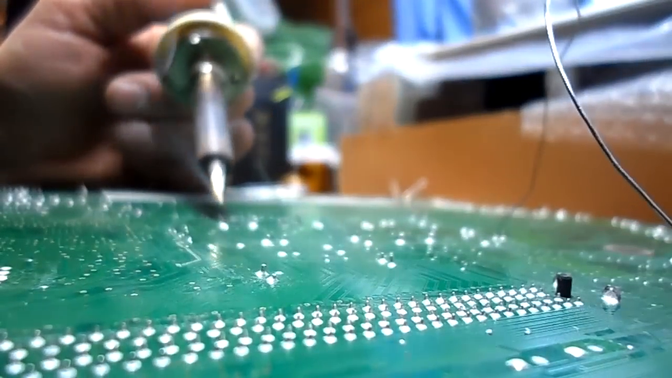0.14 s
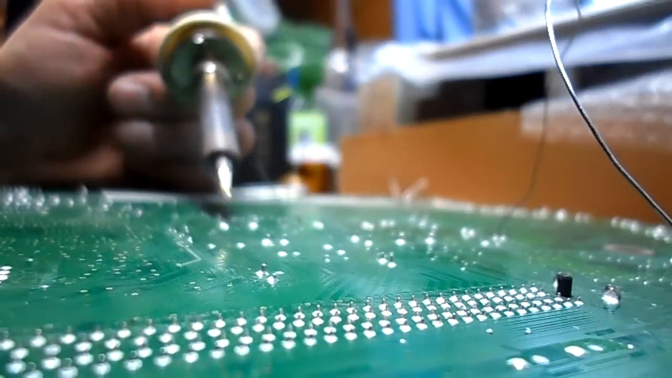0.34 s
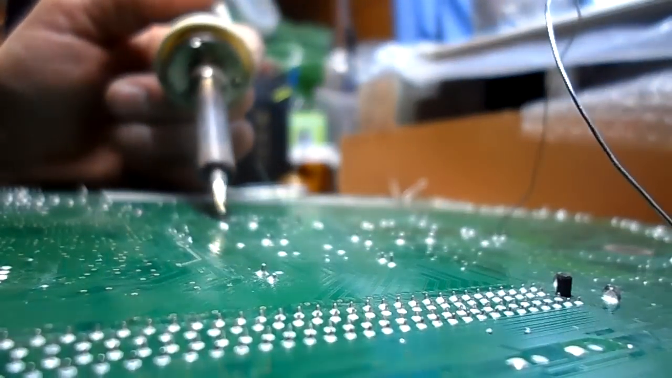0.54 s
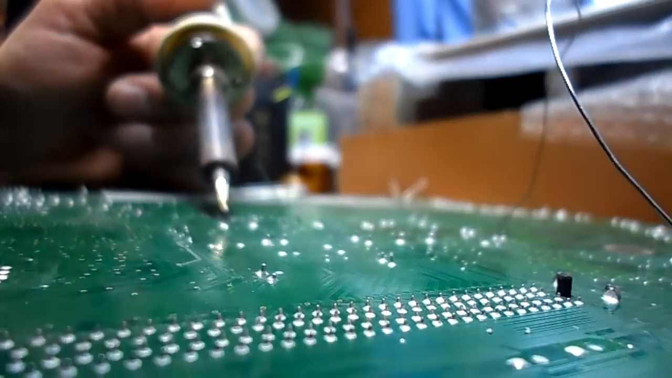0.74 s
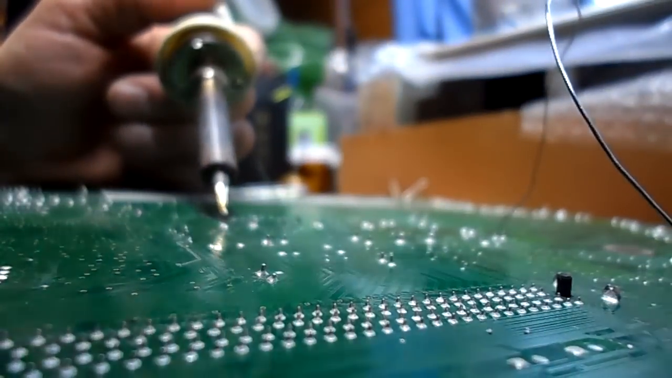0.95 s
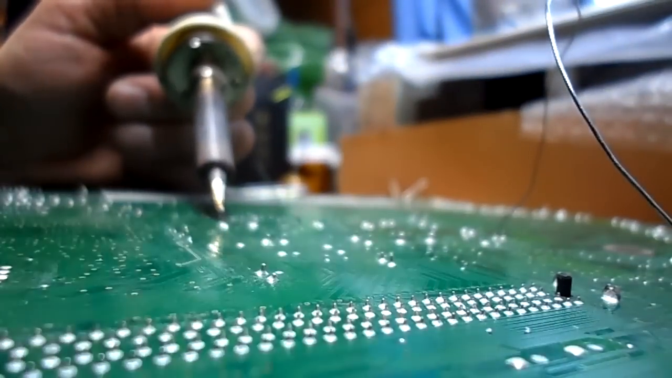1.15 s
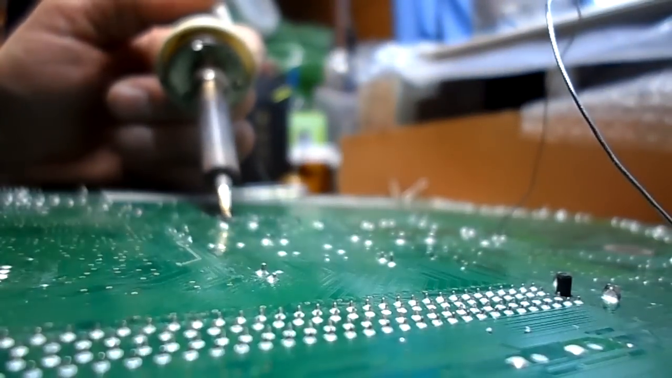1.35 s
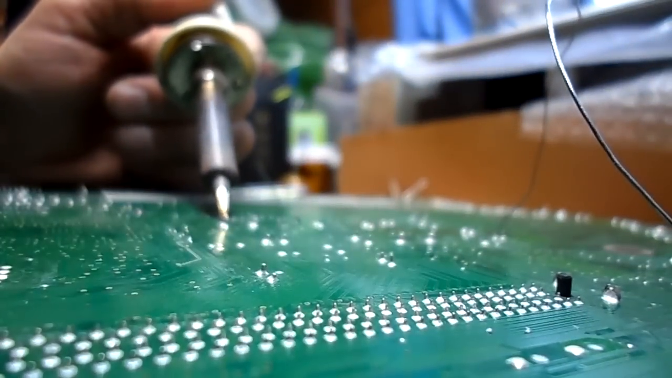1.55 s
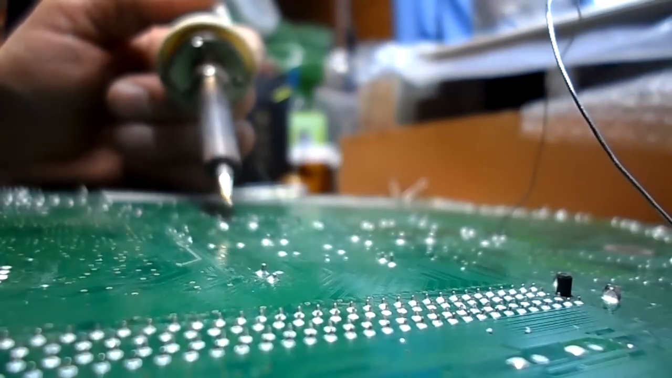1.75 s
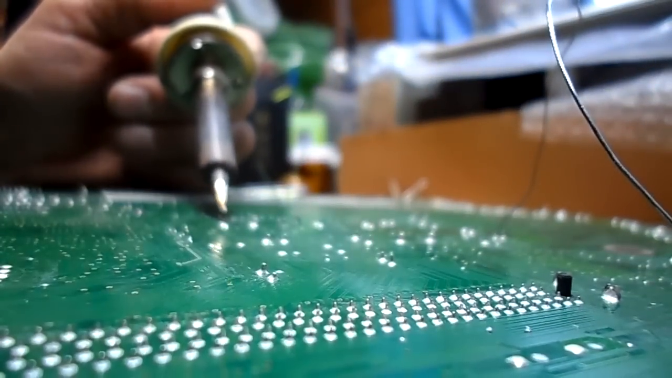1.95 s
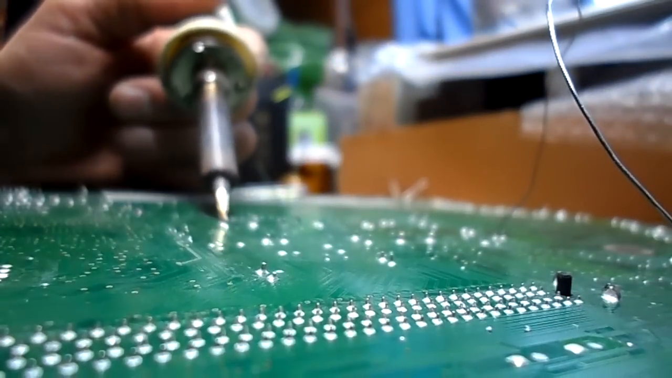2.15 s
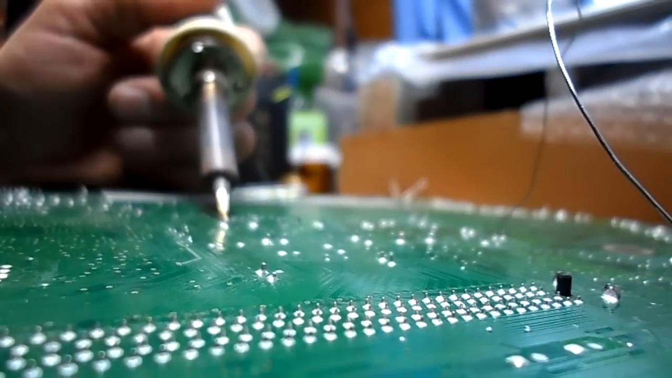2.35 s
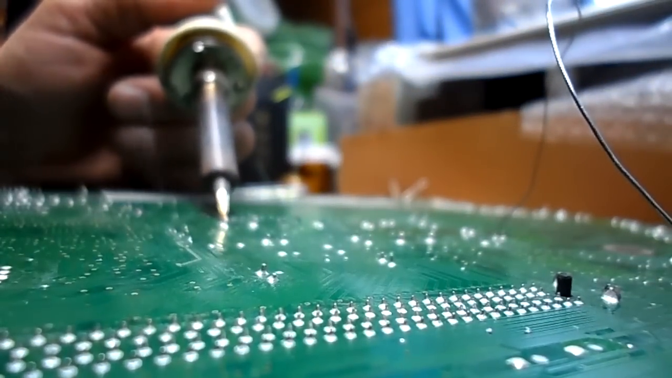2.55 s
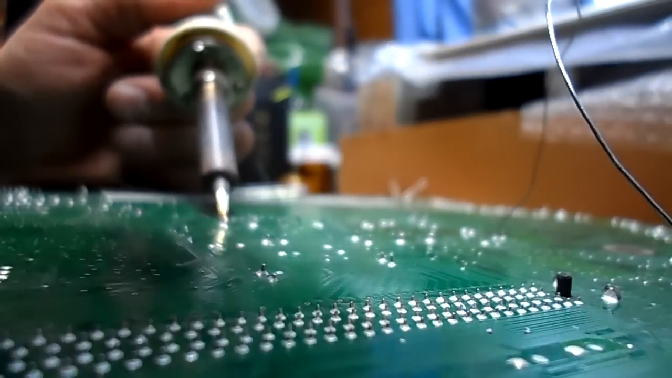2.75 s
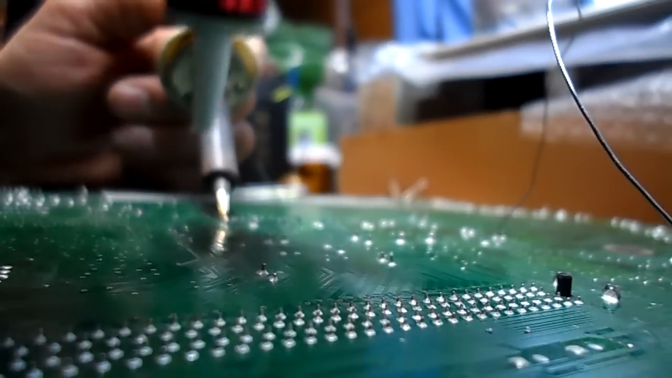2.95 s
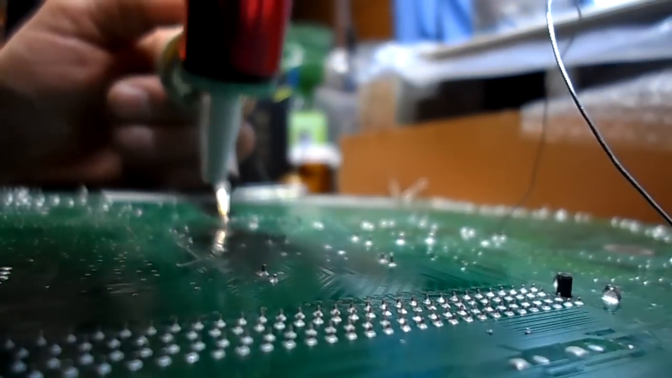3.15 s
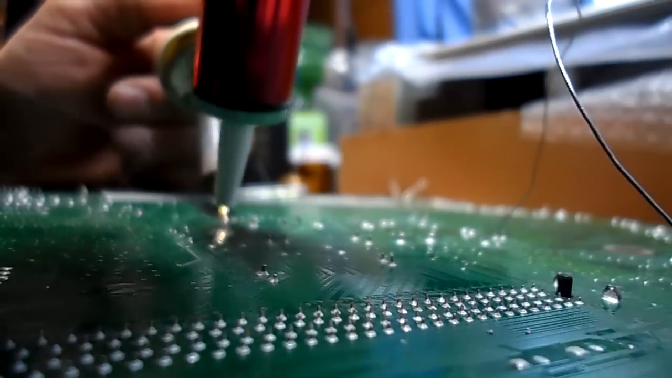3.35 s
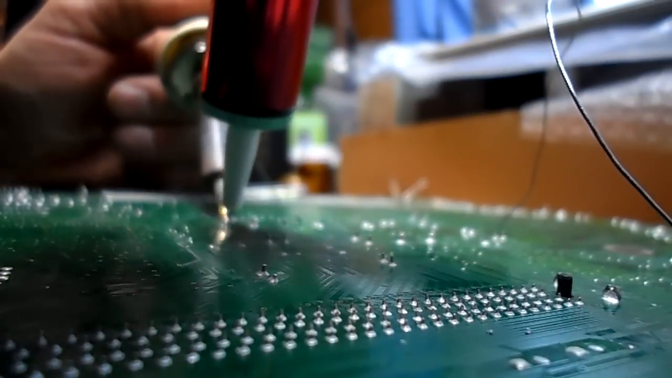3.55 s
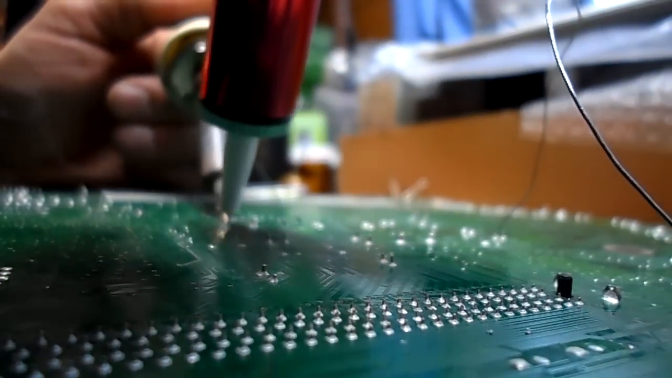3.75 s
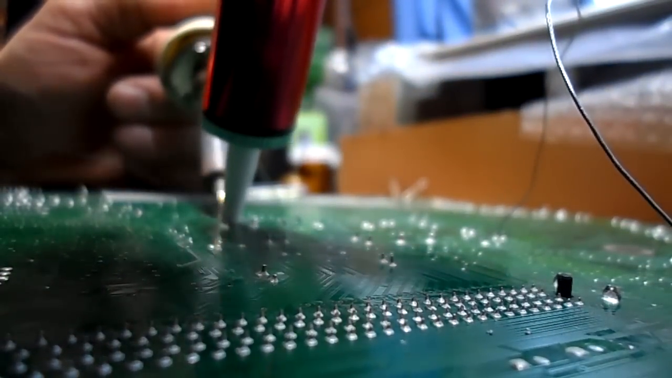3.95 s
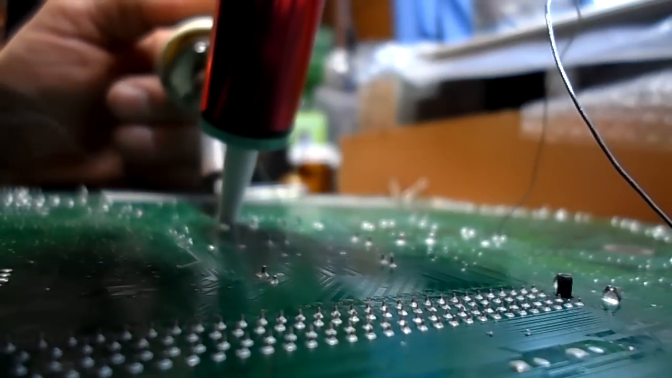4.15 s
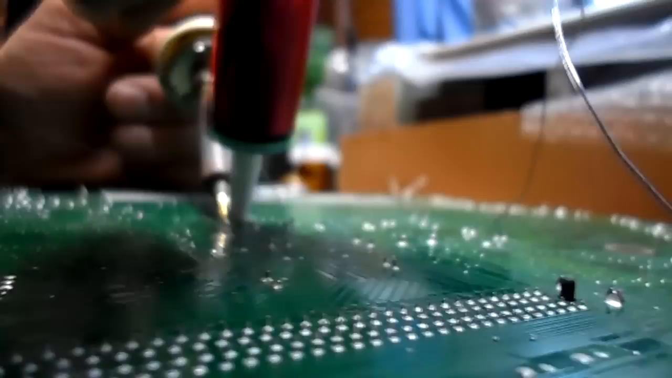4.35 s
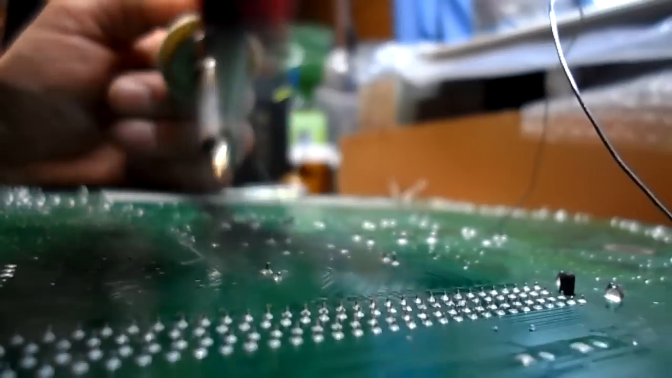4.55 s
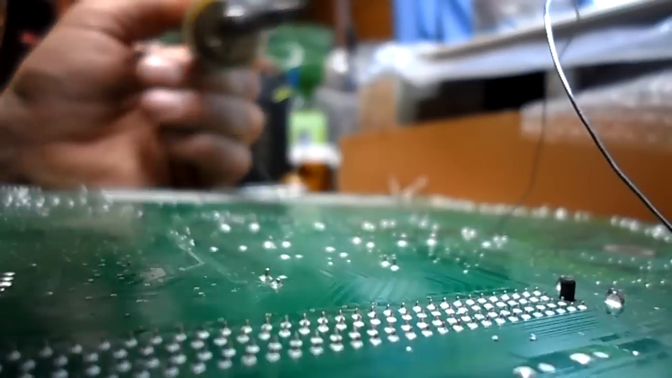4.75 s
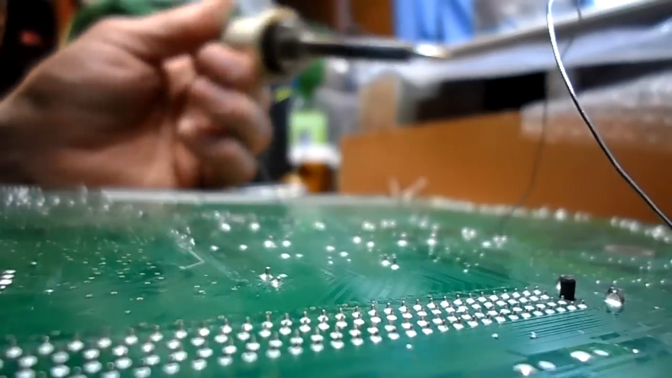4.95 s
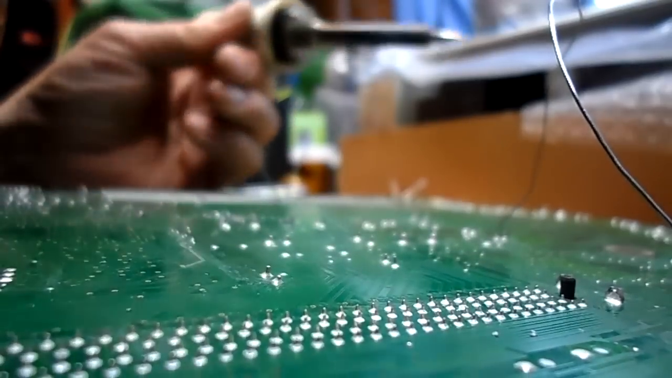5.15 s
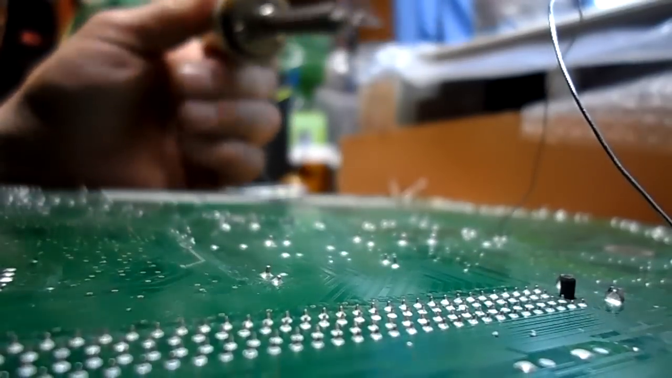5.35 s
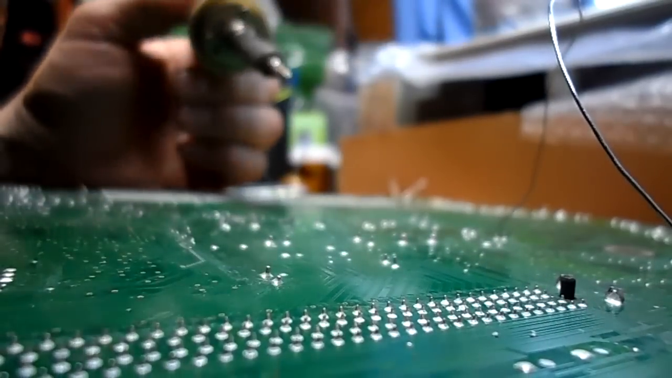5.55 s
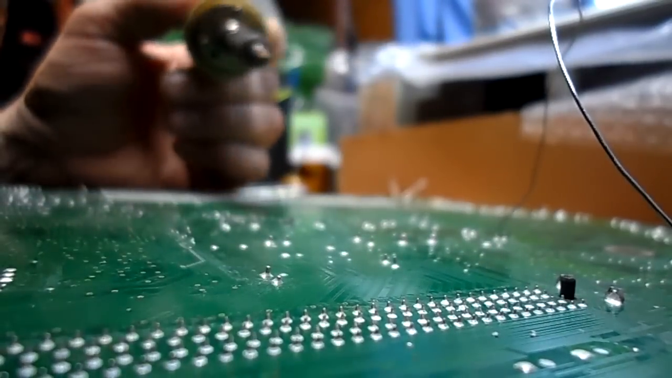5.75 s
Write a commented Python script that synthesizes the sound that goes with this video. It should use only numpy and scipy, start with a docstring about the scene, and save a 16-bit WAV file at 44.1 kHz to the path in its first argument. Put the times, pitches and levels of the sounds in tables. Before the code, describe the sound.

Light plastic clicks and finger rubbing above a humming workshop fan, a violent spring snap, then quieter handling and a bright latch click.

```python
"""Firing a solder sucker

A spring-loaded solder sucker is handled, cocked and fired over a circuit board close to a small microphone.
Blows, clicks, slips and rubbing fingers are noise bursts through resonances; thuds and the latch sum modes.
A workshop fan hums behind them as wavering tones over shaped noise, and a short room tail follows each part.
Gain control ducks after the loudest peaks, and a soft knee holds them.
"""
import sys
import numpy as np
from scipy import signal
from scipy.fft import rfft, irfft
from scipy.io import wavfile
from scipy.ndimage import uniform_filter1d, minimum_filter1d

SR = 44100
rng = np.random.default_rng(int(sys.argv[2]) if len(sys.argv) > 2 else 0)


def to_wav(s):
    """Save 16-bit WAV."""
    ch = np.atleast_2d(s).T  # columns
    pcm = np.round(np.clip(ch, -1, 1) * 32767)  # PCM
    wavfile.write(sys.argv[1], SR, pcm.astype(np.int16))


def gain_from_decibels(decibels):
    """Convert decibel values to linear amplitude factors."""
    exponent = np.asarray(decibels, float) / 20
    return 10 ** exponent


N = 255358  # samples in the scene


def evened(x):
    """Normalisation to unit rms."""
    return x / np.sqrt(np.mean(x ** 2) + 1e-20)


def peaked(x, db):
    """Normalisation to a peak level in dB."""
    return gain_from_decibels(db) * x / (abs(x).max() + 1e-12)


def read(points, hz):
    """Interpolation of a curve along logarithmic frequency."""
    f, value = np.transpose(points)
    return np.interp(np.log(hz + 1), np.log(f + 1), value)


def colour(x, points):
    """Linear filtering: the spectrum is multiplied by a gain curve in dB."""
    gain = gain_from_decibels(read(points, np.fft.rfftfreq(N, 1 / SR)))
    return irfft(rfft(x) * gain, N)


def add(mix, s, sound):
    """Superposition of a sound on the mix from time s."""
    part = mix[round(s * SR):][:len(sound)]
    part += sound[:len(part)]


def resonate(x, hz, width_hz):
    """Heterodyned resonance of unit gain: shift hz down to zero, smooth, shift back."""
    turn = np.exp(2j * np.pi * np.cumsum(hz * np.ones(len(x))) / SR)
    r = np.exp(-np.pi * width_hz / SR)
    smooth = signal.lfilter([1 - r], [1, -r], x / turn)
    return 2 * (turn * smooth).real


def steep(x, hz, width_hz):
    """Two equal resonances in cascade, which double the slope of the skirts."""
    return resonate(resonate(x, hz, width_hz), hz, width_hz)


def wander(length, size):
    """Low-passed noise of rms 1: two moving averages of size samples."""
    once = uniform_filter1d(rng.standard_normal(length), size)
    return evened(uniform_filter1d(once, size))


def drift(top_hz):
    """Slow random modulation of rms 1: 24 sines of random phase whose power falls as 1/f."""
    t = np.arange(0, N + 256, 256) / SR
    slow = sum(np.sin(2 * np.pi * (f * t + rng.random())) / np.sqrt(f)
               for f in np.geomspace(.2, top_hz, num=24))
    return np.interp(np.arange(N) / SR, t, evened(slow))


def blow(s, db):
    """Impact excitation: a crack and spring rattle colour the barrel; a low knock enters the board."""
    # barrel resonances: (centre [Hz], width [Hz], level [dB])
    barrel_modes = [(487, 400, -2), (1000, 550, -18.5), (2400, 450, -3), (3300, 1100, -8.5),
                    (5200, 1200, -9), (7000, 4300, -1.5), (10200, 1600, -0.5)]
    t = np.arange(3000) / SR
    crack = np.exp(-t / .0006)
    rattle = gain_from_decibels(-17.5 + 8.5 * wander(3000, size=25)) * np.exp(-t / 0.012)
    shake = rng.standard_normal(3000) * (crack + rattle)
    barrel = sum(gain_from_decibels(d) * evened(resonate(shake, hz, w)) for hz, w, d in barrel_modes)
    knock = steep(rng.standard_normal(3000) * crack, hz=700, width_hz=2200)
    return s, peaked(peaked(barrel, db=4.5) + peaked(knock, db=-6), db)


def latch(s, db, bright_db):
    """Modal synthesis: a sharp knock rings latch and barrel; a harder contact is brighter."""
    # modes of latch and barrel: (frequency [Hz], width [Hz], relative level [dB])
    latch_modes = [(2944, 230, -1.5), (3980, 640, -10), (5100, 350, -12), (6850, 480, -3.5),
                   (8300, 330, -12.5), (8840, 270, -9), (9570, 380, -14.5), (10800, 400, -11.5),
                   (15000, 1500, -0.5)]
    t = np.arange(1500) / SR
    sound = np.zeros(1500)
    for k, (hz, w, d) in enumerate(latch_modes):
        octaves = np.log2(hz / latch_modes[0][0])
        decay = gain_from_decibels(db + d + bright_db * octaves) * np.exp(-np.pi * w * t)
        tuning = rng.uniform(.99, 1.01)
        sound += (-1) ** k * decay * np.sin(2 * np.pi * hz * tuning * t)
    return s, sound


def ring(burst, db, low_hz, high_hz, high_db, width):
    """Source and filter: a burst excites a low and a high ring of plastic, with a little crack on top."""
    edge = np.diff(burst, prepend=0)  # small parts radiate little below their lowest ring
    low = steep(edge, low_hz, width * low_hz)
    high = steep(burst, high_hz, width * high_hz)
    crack = np.diff(edge, prepend=0)
    rings = peaked(low, db=-1.5) + peaked(high, high_db)
    return peaked(rings + peaked(crack, high_db - 7.0), db)


def click(s, db, low_hz, high_hz, high_db):
    """Exponential decay scaled by period: larger parts ring lower and rattle longer."""
    cycles, width = 3.96, 0.58  # decay time in cycles of the low ring; ring width over pitch
    t = np.arange(1500) / SR
    burst = rng.standard_normal(1500) * np.exp(-t * low_hz / cycles)
    return s, ring(burst, db, low_hz, high_hz, high_db, width)


def scrape(s, length, db, low_hz, high_hz, high_db):
    """Stick-slip friction: dense slips of uneven size while the part drags, then a quick fade."""
    t = np.arange(5000) / SR
    drag = np.minimum(t / 0.00033, 1) * np.exp(-np.maximum(t - length, 0) / 0.0015)
    unevenness = evened(uniform_filter1d(rng.standard_normal(5000), size=40))
    slips = rng.standard_normal(5000) * gain_from_decibels(3 * unevenness)
    width = 0.21 + 0.3 * np.exp(-length / 0.014)  # over pitch: a long drag rings narrower
    return s, ring(slips * drag, db, low_hz, high_hz, high_db, width)


def skid(s, length, tap_db, skid_db):
    """Friction-driven modes: a tap, then clumped slips, through the narrow modes of a metal part."""
    # modes of the part: (centre [Hz], width [Hz], relative level [dB])
    part_modes = [(1036, 58, -2.5), (1610, 120, 1.5), (2020, 95, 0), (2470, 70, -6.5), (3110, 110, -7),
                  (3400, 80, -7), (3820, 60, -14), (4800, 150, -3.5), (5400, 100, -11), (6070, 140, -7),
                  (8500, 300, -6)]
    t = np.arange(round((length + .03) * SR)) / SR
    slips = gain_from_decibels(skid_db + 5.4 * wander(len(t), size=120)) * np.exp(-np.maximum(t - length, 0) / .003)
    tap = gain_from_decibels(tap_db) * np.exp(-t / 0.0038)
    shake = rng.standard_normal(len(t)) * (slips + tap)
    # the root makes up for the lesser noise power that a narrow mode passes
    return s, 4 * sum(gain_from_decibels(d) * resonate(shake, hz, w) * (100 / w) ** .5 for hz, w, d in part_modes)


def ping(s, db, hz, t60):
    """Modal density: a cluster of close high modes dies away as a blurred ring."""
    t = np.arange(round(t60 * SR)) / SR
    cluster = evened(steep(rng.standard_normal(len(t)), hz, 0.21 * hz))
    return s, gain_from_decibels(db - 60 * t / t60) * cluster * np.minimum(t / .001, 1)


def thud(s, db, centre_hz):
    """Modal excitation: a soft push rings the bench modes near its centre, each with a looser neighbour."""
    # bench modes: (frequency [Hz], decay time t60 [s])
    bench_modes = [(30, 0.25), (60, 0.14), (92, .11), (160, 0.098), (250, 0.054), (330, 0.054),
                   (520, 0.022), (915, 0.027)]
    reach_db = -17  # per octave squared away from the centre
    t = np.arange(SR // 4) / SR
    sound = np.zeros(len(t))
    for hz, t60 in bench_modes:
        decay = gain_from_decibels(db + reach_db * np.log2(hz / centre_hz) ** 2 - 60 * t / t60)
        onset = np.minimum(t * hz * 2, 1)  # half a cycle
        pair = np.sin(2 * np.pi * hz * t) + 0.39 * np.sin(2 * np.pi * 1.3 * hz * t)
        sound += decay * onset * pair
    return s, sound


def rub(s, rise, fall, db, low_db):
    """Skin friction: grainy noise in two bands that move with pressure, a body rumble and a thin top."""
    # centres of the low, high, body and top bands [Hz]
    band_hz = (3900, 8500, 895, 13500)
    # widths of the same bands [Hz]
    band_widths = (3300, 5470, 1823, 4500)
    # share by which each centre moves at firmest pressure [ratio]
    band_lifts = (-0.11, .08, 0.047, 0.024)
    band_levels = (low_db, 0, low_db - 7.5, -7.5)  # dB against the high band
    edge_db, roundness = -22.5, 1.035  # level at slack 1; 1 = pointed stroke, 2 = round top
    t = np.arange(-1.5 * rise, 1.5 * fall, 1 / SR)
    slack = np.where(t < 0, -t / rise, t / fall)  # 0 at firmest pressure
    sound = np.zeros(len(t))
    for band_db, hz, width_hz, share in zip(band_levels, band_hz, band_widths, band_lifts):
        lift = 1 + share * (1 - slack)
        # the skin catches and lets go
        grit = rng.standard_normal(len(t)) * gain_from_decibels(2.5 * wander(len(t), size=90))
        # the grip shifts a narrower ring about
        core_hz = hz * lift * (1 + .1 * wander(len(t), size=900))
        core = steep(grit, core_hz, .25 * width_hz)
        band = evened(steep(grit, hz * lift, width_hz)) + 0.4 * evened(core)
        sound += gain_from_decibels(band_db) * evened(band)
    sound *= gain_from_decibels(db + edge_db * slack ** roundness)
    return max(s + t[0], 0), sound[t >= -s]


def squeak(length):
    """Friction through sharp filters: a faint rubbing makes three rings sing and fade."""
    # rings: (centre [Hz], width [Hz], rms level before the swell [dB])
    squeak_rings = [(2810, 400, -68.5), (5600, 700, -69), (7500, 700, -70)]
    grit = rng.standard_normal(round(length * SR))
    rings = sum(gain_from_decibels(db) * evened(steep(grit, hz, w)) for hz, w, db in squeak_rings)
    return rings * signal.windows.hann(len(grit))


def fan():
    """Tonal and broadband machine noise: wavering blade and motor tones over shaped air noise."""
    # level shared by tones and air: (time [s], level [dB])
    fan_levels = [(0, 0.5), (1.4, 1.5), (2.1, 1.5), (3.0, -0.5), (3.8, -0.5), (4.5, -2), (5.79, -5)]
    # steady tones: (frequency [Hz], rms level before the shared level [dB], waver [dB])
    hum_tones = [(116.3, -71, 2.5), (180.2, -69.5, 4), (249.5, -47.5, 1.17), (738, -81, 2.5)]
    # swelling and fading motor whine: (time [s], rms level before the shared level [dB])
    whine_levels = [(0, -68.5), (.4, -69), (.95, -66.5), (1.55, -78), (2.05, -65), (2.64, -72),
                    (3.1, -66.5), (3.85, -69.5), (4.4, -65), (5.0, -69), (5.5, -62.5)]
    # shape of the air spectrum: (frequency [Hz], relative density [dB per Hz])
    air_shape = [(15, -5), (30, -1.5), (50, -6.5), (90, -17), (180, -12.5), (300, -19), (600, -25),
                 (1050, -23.5), (1800, -29.5), (3000, -34.5), (6000, -35.5), (10500, -35.5), (13000, -32),
                 (15500, -26.5)]
    air_db = -57.5  # rms before the shared level
    t = np.arange(N) / SR
    tones = hum_tones + [(1499, np.interp(t, *np.transpose(whine_levels)), 1.2)]
    hum = np.zeros(N)
    for hz, db, waver in tones:
        strength = np.sqrt(2) * gain_from_decibels(db + waver * drift(top_hz=12))
        phase = 2 * np.pi * (hz * t + rng.random()) + 0.34 * drift(top_hz=7.7)
        hum += strength * np.sin(phase)
    air = colour(rng.standard_normal(N), air_shape)
    return gain_from_decibels(np.interp(t, *np.transpose(fan_levels))) * (hum + gain_from_decibels(air_db) * evened(air))


def room(x):
    """Reverberation: sparse taps of random sign, each band dying at its own speed."""
    # reverberation time: (frequency [Hz], t60 [s])
    decay_times = [(300, 0.22), (1500, 0.16), (4000, 0.043), (9000, .12), (14000, 0.084)]
    taps = np.zeros(SR // 2)
    at = np.arange(80, len(taps) - 20, 20)
    taps[at + rng.integers(0, 20, len(at))] = rng.choice([-1., 1.], len(at))
    hz, t, z = signal.stft(taps, SR, nperseg=128)
    decay = gain_from_decibels(-60 * t / read(decay_times, hz)[:, None])
    tail = signal.istft(z * decay, SR, nperseg=128)[1]
    return signal.fftconvolve(x, tail / np.linalg.norm(tail))[:N]


def scene():
    """Superposition of near sounds, their reverberation and the fan."""
    # the piston slams home and bounces: (time [s], peak level [dB])
    blows = [(4.5049, -4), (4.5055, -5.5), (4.5078, -0.5), (4.5097, -18), (4.5162, -1), (4.5224, -5),
             (4.528, -17), (4.5351, -9.5), (4.543, -17), (4.5486, -28), (4.558, -18), (4.562, -17.5)]
    # the latch catches in two quick knocks: (time [s], knock level [dB], brightness [dB per octave])
    latch_knocks = [(5.672, -7.5, -8), (5.6733, -8, 2.5)]
    # clicks of plunger, latch and iron: (time [s], peak level [dB], low ring [Hz], high ring [Hz],
    # high ring peak where the low ring has -1.5 [dB])
    clicks = [(0.2992, -28, 3500, 9300, 5.5), (.536, -43, 4800, 8800, 3), (0.775, -36, 5600, 8500, 15),
              (0.79, -29.5, 4500, 9800, 9), (0.7968, -22, 3900, 10200, 7.5),
              (0.8808, -36.5, 2460, 5100, -6), (0.591, -45, 4700, 7500, -6), (0.9105, -41, 3570, 9000, -4),
              (0.956, -48, 4500, 8000, 5), (1.7104, -41.5, 1950, 10400, -17), (1.9039, -17, 4500, 9000, 12),
              (1.907, -17.5, 2900, 8160, 1), (2.2787, -45, 3600, 6200, -9), (2.302, -48.5, 2720, 4000, -15),
              (1.673, -53, 6000, 10500, 3), (2.479, -42, 2550, 7500, 11), (4.076, -46, 3000, 7900, -3.5),
              (4.647, -47, 2510, 5010, -3), (4.8692, -25.5, 3520, 5860, 2), (4.946, -36.5, 5200, 8200, 17),
              (5.0576, -32.5, 3500, 5460, 14), (5.081, -32.5, 2700, 5100, -6),
              (5.1412, -28.5, 7200, 9900, 24), (5.202, -40, 4500, 9500, 10.5), (5.286, -45, 2270, 3900, -8),
              (5.3518, -31.5, 4500, 8100, -12), (5.364, -43, 8000, 12000, -9),
              (5.47, -37.5, 3170, 9600, -17), (5.63, -25.5, 5600, 9100, -3)]
    # parts dragging in quick slips: (time [s], length [s], then the columns of the clicks from the peak on)
    scrapes = [(0.315, 0.011, -36.5, 2440, 8400, -23), (0.729, .018, -50, 5200, 9100, -4),
               (1.011, 0.013, -35, 7000, 10500, 13), (2.111, 0.0055, -31.5, 4030, 8000, -1),
               (2.1165, 0.012, -9.5, 2700, 7100, 13), (2.1277, .002, -13, 3300, 8200, 7.5),
               (2.129, 0.0069, -21, 4100, 10500, 2)]
    # a metal part is set down and skids: (start [s], length [s], tap drive [dB], slip drive [dB])
    skids = [(.048, 0.086, -37.5, -55.5), (.21, 0.094, -66, -59.5), (2.27, 0.045, -66, -67.5),
             (4.86, 0.0365, -61, -61)]
    # metal parts that ring on after a knock: (time [s], starting level [dB], centre [Hz], t60 [s])
    pings = [(0.8796, -43, 2330, 0.034), (1.91, -50, 4900, .12), (2.144, -54, 3300, 0.068),
             (4.6, -57, 6300, 0.11), (5.675, -42.5, 3050, 0.22), (5.674, -38, 10840, 0.093),
             (5.675, -40, 7950, 0.21)]
    # dull thuds through the bench: (time [s], push level [dB], centre [Hz])
    thuds = [(.26, -41, 60), (2.117, -35, 330), (2.12, -40, 60), (4.075, -50.5, 90.6), (4.505, -19.5, 40),
             (4.504, -23, 407), (4.515, -20.5, 150), (4.543, -23, 226), (4.563, -22.5, 84),
             (4.635, -36, 70), (4.744, -39, 60), (5.085, -45, 520), (5.18, -42.5, 162), (5.289, -36.5, 915),
             (5.29, -35.5, 478), (5.334, -34.5, 134), (5.672, -37, 920)]
    # fingers sliding on the tool: (time of firmest pressure [s], rise [s], fall [s],
    # level of the high band [dB], low band over high [dB])
    strokes = [(.0, 0.00086, 0.043, -73, -1), (0.051, 0.0026, .1, -63, 0), (.12, 0.053, 0.04, -64, -2),
               (0.241, 0.089, 0.15, -57.5, -9), (.32, .1, 0.17, -53.5, -11.5),
               (0.548, 0.032, 0.079, -57.5, -14), (.64, 0.13, 0.14, -59.5, -12),
               (.77, 0.13, 0.073, -58.5, -14), (.926, 0.048, 0.093, -63.5, -9),
               (1.017, 0.018, 0.014, -52, -27), (1.195, 0.062, 0.036, -63.5, -10),
               (1.475, 0.24, 0.092, -62, -8), (1.59, 0.036, 0.05, -55, -9), (1.71, 0.0035, 0.22, -53, -1.5),
               (1.839, 0.19, 0.25, -50.5, -11.5), (1.909, 0.011, 0.16, -57.5, -0.5),
               (2.105, 0.054, 0.0096, -59.5, -12), (2.137, 0.0021, 0.052, -51.5, -1),
               (2.226, .07, 0.068, -50, -18), (2.29, 0.1, .1, -67, 4.5), (2.432, 0.029, 0.068, -69, -15),
               (2.573, 0.086, 0.099, -66, -3.5), (2.7, .1, .1, -74, -7), (2.86, .15, 0.13, -71.5, -14),
               (3.037, .04, .09, -68.5, -12.5), (4.081, 0.043, 0.045, -75, -1),
               (4.7, .015, 0.018, -68, 5.5), (4.74, 0.022, 0.035, -63.5, 2.5), (4.87, .05, 0.066, -58.5, 0),
               (4.959, .04, .13, -52, -30), (5.04, 0.016, .015, -55, -29), (5.165, .015, 0.037, -61.5, -25),
               (5.089, .1, .04, -52, -11.5), (5.281, 0.39, 0.0041, -67, 0.5),
               (5.289, .002, 0.14, -50, -0.5), (5.475, 0.0042, 0.47, -54.5, 3),
               (5.66, 0.77, 0.0097, -54, -6)]
    # the squeak: (start [s], length [s])
    squeak_time = (2.77, .17)
    room_db = -16
    near = np.zeros(N)
    for play, table in ((blow, blows), (latch, latch_knocks), (click, clicks), (scrape, scrapes),
                        (skid, skids), (ping, pings), (thud, thuds), (rub, strokes)):
        for row in table:
            add(near, *play(*row))
    add(near, squeak_time[0], squeak(squeak_time[1]))
    return (near + gain_from_decibels(room_db) * room(near) + fan())[None]


def band_limit(x):
    """A steep low-pass at the top of the band."""
    return signal.sosfilt(signal.butter(12, 17120, fs=SR, output="sos"), x)


def record(dry):
    """Dynamic compression: a dull microphone, gain pulled down fast by peaks, and a limiting knee."""
    # treble: the microphone dulls above 11 kHz, and the sound falls away steeply near 15.8 kHz: (frequency
    # [Hz], gain [dB])
    treble_response = [(9000, 0.5), (11000, -0.5), (12500, -8), (15600, -11.5), (16000, -35.5), (17000, -41)]
    hiss_db = -77  # microphone electronics, after the gain control
    heard = colour(dry[0], treble_response)
    over = np.clip((abs(heard) - .38) / .03, 0, 1)
    held = -minimum_filter1d(-over, size=4001, origin=2000)  # each peak is held for 4000 samples
    r = np.exp(-1 / (0.012 * SR))  # 12 ms attack
    pull = np.log(signal.lfilter([1 - r], [1, -r], held) + 1e-9)
    t = np.arange(N) / SR
    # the dip recovers quickly at first, then slowly: (depth in dB, time constant in s)
    dip_db = sum(db * np.exp(np.maximum.accumulate(pull + t / s) - t / s)
                 for db, s in ((7.4, 0.3), (8.55, 0.25)))
    hiss = gain_from_decibels(hiss_db) * colour(rng.standard_normal(N), treble_response)
    ducked = heard * gain_from_decibels(-dip_db) + hiss
    limited = ducked / (1 + abs(ducked / .43) ** 4) ** (1 / 4)
    return band_limit(limited[None])


dry = scene()
out = record(dry)
to_wav(out)
```